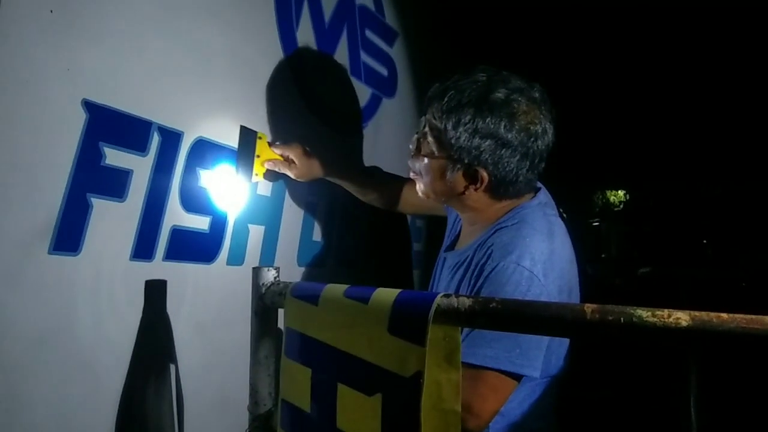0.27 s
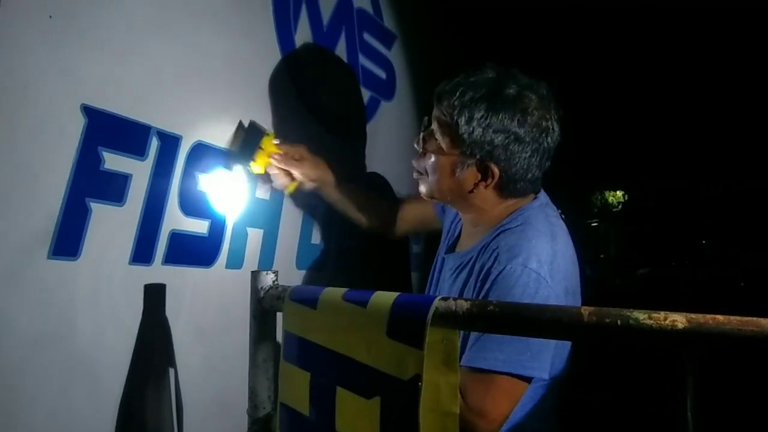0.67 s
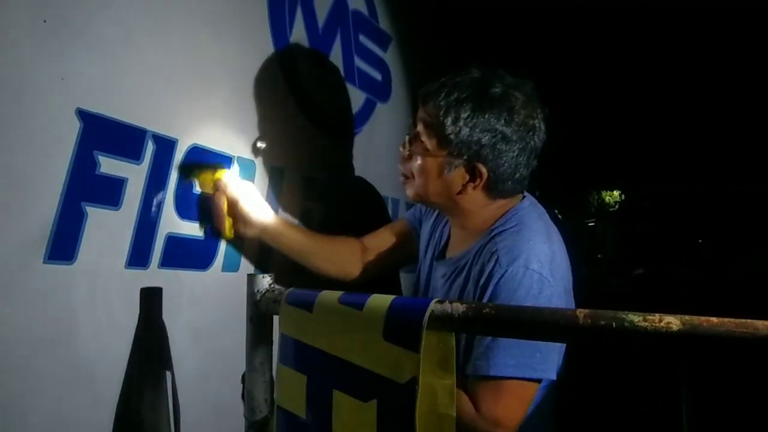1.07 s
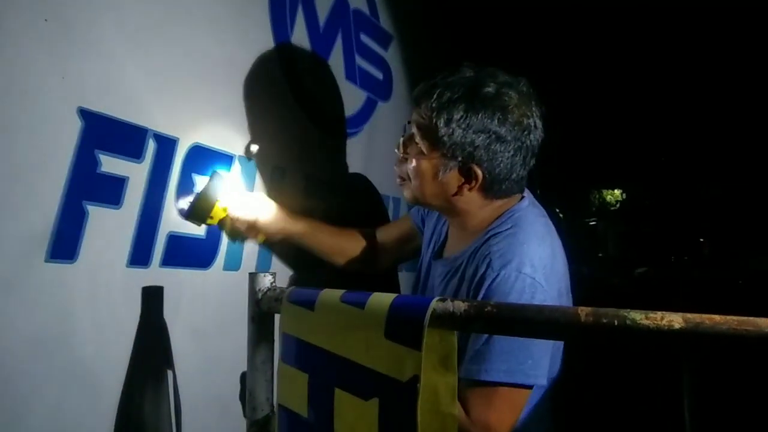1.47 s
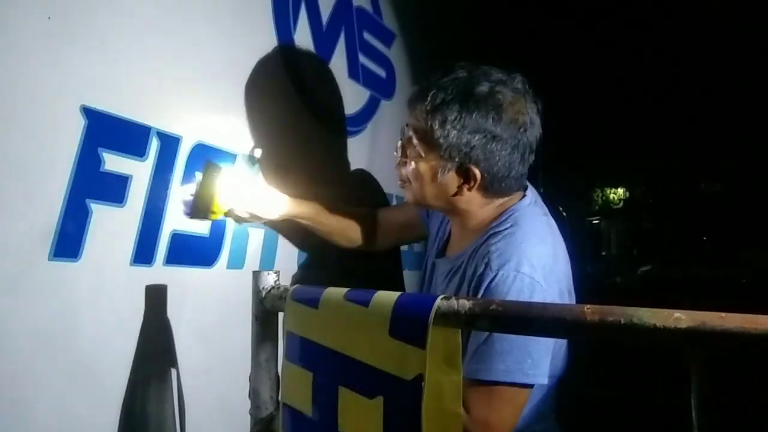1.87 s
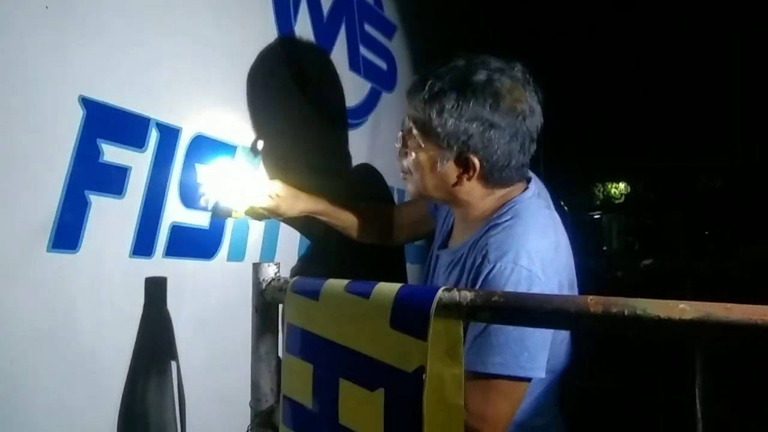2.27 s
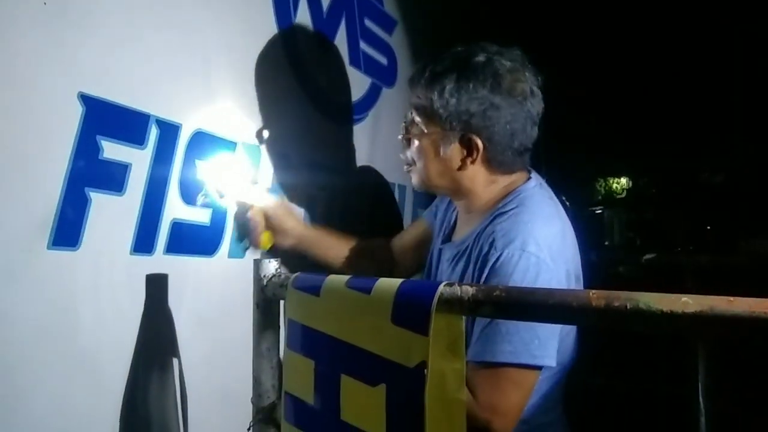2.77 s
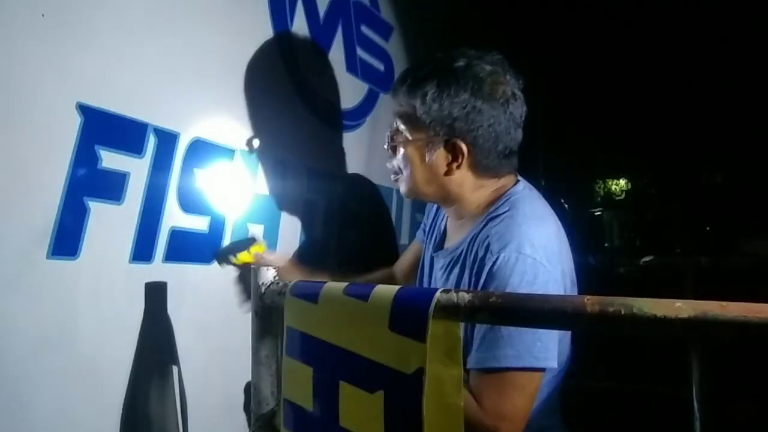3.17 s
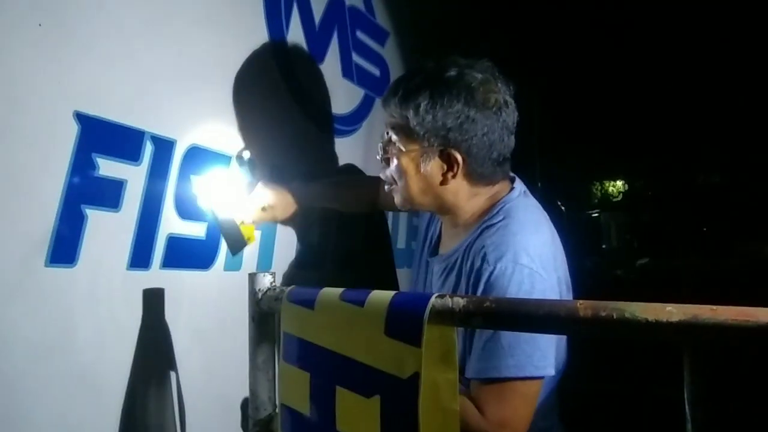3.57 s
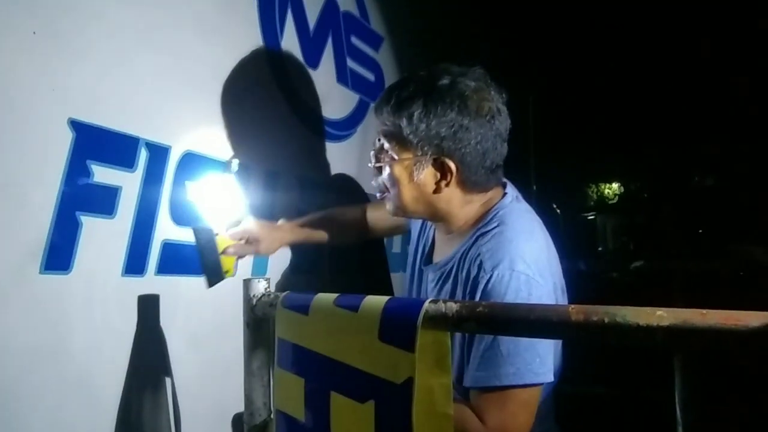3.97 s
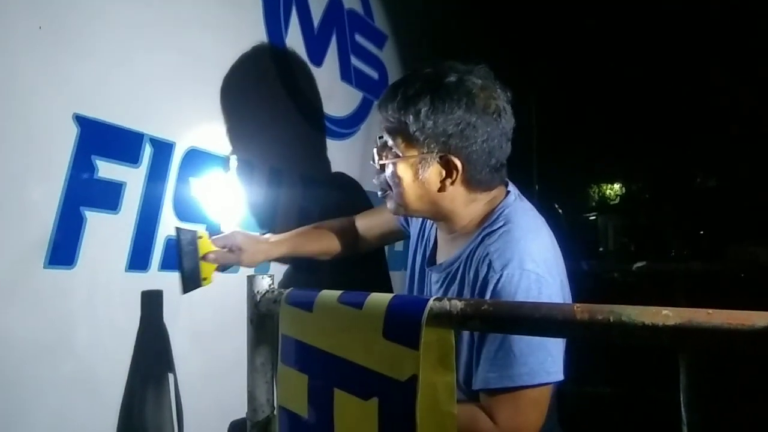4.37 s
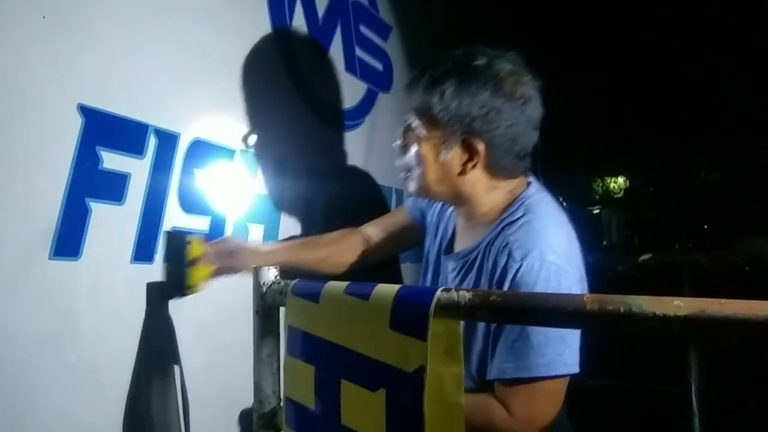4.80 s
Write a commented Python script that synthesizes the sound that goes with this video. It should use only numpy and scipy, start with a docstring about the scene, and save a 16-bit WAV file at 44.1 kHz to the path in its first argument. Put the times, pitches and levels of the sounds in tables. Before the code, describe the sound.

Rapid high insect chirping dominates a dark yard, with soft rubbing, dull knocks and small plastic taps on a panel, and distant low humming.

```python
"""A yard at night: a cricket close by chirps ten times a second, and the walls and the yard answer it.
Its song is gliding tones, three wing strokes to a chirp. Farther off, bush crickets zip and another insect
trills in pulsed tones, over a chorus of shaped noise. A plastic squeegee bumps and taps (noise through
resonances) and softly scrapes (shaped noise) on a vehicle's side. A distant engine hums: tones and noise."""
import sys
import numpy as np
from scipy import signal
from scipy.fft import rfft, irfft, next_fast_len
from scipy.io import wavfile
from scipy.ndimage import uniform_filter1d, map_coordinates

SR = 44100
rng = np.random.default_rng(int(sys.argv[2]) if len(sys.argv) > 2 else 0)


def inscribe(sig):
    """Save sig as 16-bit PCM at rate SR to the path in sys.argv[1].

    A 1-D sig is mono; a 2-D sig holds one channel per row.
    Samples are clipped to [-1, 1] before scaling.
    """
    pcm = np.round(np.clip(np.atleast_2d(sig).T, -1, 1) * 32767)
    wavfile.write(sys.argv[1], SR, pcm.astype(np.int16))


N = 222117  # length in samples


def amp(db):
    """Decibels to gain."""
    return 10 ** (np.asarray(db) / 20)


def unit(x):
    """Scale to an average strength (rms) of 1."""
    return x / np.sqrt(np.mean(x ** 2) + 1e-20)


def clock():
    """The time of every sample, in seconds."""
    return np.arange(N) / SR


def curve(rows):
    """Join (seconds, value) points by straight lines, one value per sample."""
    seconds, values = np.transpose(rows)
    return np.interp(clock(), seconds, values)


def wobble(rate):
    """A smooth random curve through `rate` random points a second."""
    points = rng.standard_normal(int(N * rate / SR) + 4)
    return map_coordinates(points, [clock() * rate])


def phase(hz):
    """Running phase of a gliding tone."""
    return 2 * np.pi * np.cumsum(hz) / SR


def add(track, start_s, sound):
    """Mix a sound into the track, cutting off what lies outside it."""
    i = round(start_s * SR)
    part = sound[max(-i, 0):max(N - i, 0)]
    track[max(i, 0):][:len(part)] += part


def filtered(x, response):
    """Pass x through a filter given as a function of frequency."""
    size = next_fast_len(len(x) + SR // 2)
    hz = np.fft.rfftfreq(size, 1 / SR)
    return irfft(rfft(x, size) * response(hz), size)[:len(x)]


def resonance(f, centre, width):
    """Response of one damped mode: strongest at its own pitch."""
    return 1j * f * width / (centre ** 2 - f ** 2 + 1j * f * width)


def band(f, centre, half_width):
    """Response of a flat-topped pass band with steep sides."""
    return 1 / np.sqrt(1 + np.abs((f - centre) / half_width) ** 20)


def rush(spectrum, patchy_db):
    """Coloured noise of rms 1 whose gain varies in patches over time and pitch."""
    grid = signal.stft(rng.standard_normal(N), nperseg=1024)[2]
    patches = uniform_filter1d(rng.standard_normal(grid.shape), 4, 0)  # smooth over pitch
    patches = uniform_filter1d(patches, 14, 1)  # smooth over time
    noise = signal.istft(grid * amp(patchy_db * unit(patches)), nperseg=1024)[1][:N]
    hz, db = np.transpose(spectrum)
    return unit(filtered(noise, lambda f: amp(np.interp(np.log(f + 1), np.log(hz), db))))


def yard(x, wet_db, t60):
    """A sound with its own diffuse echo, which fades by 60 dB in t60 seconds."""
    t = np.arange(SR // 3) / SR
    tail = rng.standard_normal(len(t)) * amp(-60 * t / t60) * (1 - np.exp(-t / 0.001))
    wet = signal.fftconvolve(x, tail)
    wet *= np.linalg.norm(x) / np.linalg.norm(wet)  # as much energy as the direct sound
    return np.pad(x, (0, len(t) - 1)) + amp(wet_db) * wet


# Colour of the far insects. Each row: frequency in Hz, relative level in dB.
CHORUS_COLOUR = [(5200, -48), (5600, -15.5), (5800, -8.5), (6100, -22.5), (6700, 2.5), (7450, 1), (7800, 4),
                 (8400, -10.5), (8800, -13), (9300, -63), (10300, -20), (10700, -2.5), (11300, -9.5),
                 (11900, -32), (13000, -53)]


def chorus(level_db=-69.5, hiss_db=-86):
    """Many far insects merge into shimmering bands of noise above an even, faint hiss."""
    # Each row: frequency in Hz, relative level in dB.
    hiss_colour = [(2000, 4.5), (4500, 1.5), (9000, 2.0), (12500, -11.5), (15500, 1)]
    hiss = amp(hiss_db) * rush(hiss_colour, patchy_db=1.5)
    insects = amp(level_db + 0.19 * wobble(4.3)) * rush(CHORUS_COLOUR, patchy_db=7.0)
    return insects + hiss


FIRING_HZ, SAG_HZ_PER_S = 69.1, 0.518  # the engine slowly loses speed
HUM_DB, HUM_RAMP_S = -68.5, 0.13  # the firing tone at rest; how fast a surge comes and goes
# Spells of heavier load. Each row: start in seconds, length in seconds, added tone in dB.
LOAD_SURGES = [(-.1, 1.76, -71.5), (1.87, 1.01, -62.5), (3.88, 1.5, -60)]
# Colours of the low rumble and the higher drone. Each row: frequency in Hz, relative level in dB.
RUMBLE_COLOUR = [(15, -32.5), (32, -0.5), (38, -22.5), (44, -18), (53, 3.5), (80, 1), (110, 0.5), (135, 1),
                 (170, -22), (260, -30), (500, -73)]
DRONE_COLOUR = [(110, -52), (143, -9.5), (151, 6.5), (161, 3), (177, 2), (195, -11), (230, -15), (330, -32),
                (600, -60.5)]
# Their strength, before the fixed gains below. Each row: time in seconds, level in dB.
RUMBLE_STRENGTH = [(0.0, -65.5), (1.52, -64.5), (1.74, -69.5), (3.0, -63.5), (3.34, -70), (4.1, -66.5),
                   (4.31, -63.5), (5.04, -65.5)]
DRONE_STRENGTH = [(0.0, -58), (0.28, -61.5), (0.94, -70), (1.09, -74), (1.33, -66.5), (1.67, -73),
                  (1.87, -73.5), (2.02, -70.5), (2.27, -72.5), (2.89, -74), (3.41, -84), (4.18, -69),
                  (4.81, -71), (5.04, -69.5)]
# Steady tones in the drone. Each row: pitch in Hz, relative level in dB.
DRONE_TONES = [(125.5, -3), (151, -0.5), (177.5, -4)]


def engine(rumble_db=4, drone_db=1, lines_db=-1):
    """A distant engine: a wavering firing tone that surges under load, a noisy rumble and a toned drone."""
    t = clock()
    tone = lambda hz: unit(np.sin(phase(hz + 0.63 * wobble(8))))
    load = amp(HUM_DB)
    for start_s, length_s, db in LOAD_SURGES:
        nearest_end_s = np.minimum(t - start_s, start_s + length_s - t)
        load = load + amp(db) * np.clip(nearest_end_s / HUM_RAMP_S, 0, 1)
    hum = load * tone(FIRING_HZ - SAG_HZ_PER_S * t)
    rumble = amp(curve(RUMBLE_STRENGTH) + rumble_db) * rush(RUMBLE_COLOUR, patchy_db=1)
    lines = sum(amp(db) * tone(hz) for hz, db in DRONE_TONES)
    drone = amp(drone_db) * rush(DRONE_COLOUR, patchy_db=2.5) + amp(lines_db) * lines
    return hum + rumble + amp(curve(DRONE_STRENGTH)) * drone


# Each row: start in seconds, length in seconds, level in dB before the echo, pitch in Hz.
FAR_TRILLS = [(0.143, .56, -80, 3793), (2.499, 0.53, -79, 3793), (4.56, 0.11, -99, 3763),
              (4.74, 0.041, -87, 3590), (4.915, 0.11, -86.5, 3740)]


def far_trills(pulse_rate=75, rise_hz=80, fall_hz=400, uneven_db=1.5, waver_hz=55):
    """A distant insect swells into a soft, uneven pulsed whistle, blurred by echoes."""
    out = np.zeros(N)
    for start_s, length_s, db, hz in FAR_TRILLS:
        u = np.linspace(0, 1, int(length_s * SR))  # 0 to 1 through the trill
        chance = lambda: wobble(pulse_rate)[:len(u)]
        cycle = (u * length_s * pulse_rate + 0.24 * chance()) % 1  # 0 to 1 through each pulse
        tone = np.sin(phase(hz + rise_hz * (u - .5) + fall_hz * (.5 - cycle) + waver_hz * chance()))
        swell = amp(uneven_db * chance()) * np.abs(np.sin(np.pi * u ** 1.22)) ** 0.56
        pulses = np.abs(np.sin(np.pi * cycle)) ** 4
        add(out, start_s, yard(amp(db) * unit(swell * pulses * tone), wet_db=4, t60=0.12))
    return out


# Each row: start in seconds, length in seconds, level in dB before echo and filter,
# first pitch in Hz, last pitch in Hz, fall within a pulse in Hz.
BUSH_CRICKET_ZIPS = [(-.02, 0.044, -61, 9100, 9280, 1500), (.105, 0.02, -88, 14900, 15100, 900),
                     (1.708, 0.063, -62, 9230, 9540, 1630), (1.937, 0.039, -66, 12000, 12960, 1300),
                     (1.962, 0.044, -69.5, 14500, 15050, 3750), (4.952, 0.047, -60.5, 9170, 9500, 1510)]


def bush_crickets(pulse_rate=215, onset_db=-10):
    """A zip is a quick run of falling pulses that climbs in pitch and strength."""
    out = np.zeros(N)
    for start_s, length_s, db, first_hz, last_hz, fall_hz in BUSH_CRICKET_ZIPS:
        u = np.linspace(0, 1, int(length_s * SR))  # 0 to 1 through the zip
        cycle = (u * length_s * pulse_rate + 0.5 * wobble(100)[:len(u)]) % 1
        hz = first_hz + (last_hz - first_hz) * u + fall_hz * (.5 - cycle)
        swell = amp(onset_db * (1 - u) ** 2) * signal.windows.tukey(len(u), .1)
        tone = np.sin(phase(hz + 220 * wobble(300)[:len(u)]))
        pulses = np.tanh(5 * np.sin(np.pi * cycle) ** 2) * tone
        wing = lambda f: band(f, (first_hz + last_hz) / 2, 0.5 * fall_hz)
        echoed = yard(amp(db) * unit(swell * pulses), wet_db=4.0, t60=0.35)
        add(out, start_s, filtered(echoed, wing))
    return out


# Colours of the rub, the panel's body and the blade's edge. Each row: frequency in Hz, relative level in dB.
RUB_COLOUR = [(260, -38), (450, -12.5), (540, -10.5), (660, 4.5), (760, -0.5), (900, 5.5), (1150, -1),
              (1400, 4), (1650, 3.5), (2080, -3), (2250, -46.5), (2600, -39), (3400, -73), (5000, -109)]
BODY_COLOUR = [(180, -24.5), (290, -5.5), (350, -9), (440, 2), (560, 8.5), (700, -18), (900, -66)]
EDGE_COLOUR = [(1700, -28), (2150, 6), (2400, -0.5), (2800, -13), (3400, -46), (4500, -34)]
# How hard the blade rubs, before lifts and small changes. Each row: time in seconds, level in dB.
RUB_EFFORT = [(0.0, -65.5), (0.22, -66.5), (0.38, -70.5), (0.62, -69.5), (0.76, -69.5), (0.98, -71.5),
              (1.15, -64.5), (1.37, -68.5), (1.54, -66), (1.71, -66.5), (2.1, -70), (2.23, -65.5),
              (2.72, -68), (3.09, -63), (3.9, -62.5), (4.21, -61), (4.71, -59), (5.04, -58)]
# The blade eases off the panel between strokes. Each entry: time in seconds.
BLADE_LIFTS = [0.507, 1.138, 1.7]
LIFT_DB, LIFT_LENGTH_S = -8, 0.047
USUAL_EFFORT_DB = -64
BODY_DB, BODY_GROWS = -73.5, 1.79  # the panel's body at usual effort; its dB per dB of effort
EDGE_DB, EDGE_GROWS = -86.5, 2.88  # the same for the hiss of the blade's edge
# The blade's edge swishes once as it is turned round.
FLICK_S, FLICK_LENGTH_S, FLICK_DB = 0.918, 0.074, -77.5


def scrape(echo_share=0.38, echo_hz=210, rub_db=1.35, grain_db=1, unsteady_db=1.2):
    """The blade rubs with a fine grain; effort brings out body and edge; a shifting echo colours it."""
    bump = lambda s, length_s: np.exp(-((clock() - s) / length_s) ** 2)
    level_db = curve(RUB_EFFORT) + sum(LIFT_DB * bump(s, LIFT_LENGTH_S) for s in BLADE_LIFTS)
    push_db = level_db - USUAL_EFFORT_DB
    rub_level_db = level_db + rub_db + grain_db * wobble(120) + unsteady_db * wobble(14)
    rub = amp(rub_level_db) * rush(RUB_COLOUR, patchy_db=3.0)
    body = amp(BODY_DB + BODY_GROWS * push_db) * rush(BODY_COLOUR, patchy_db=5.5)
    flick = amp(FLICK_DB) * bump(FLICK_S, FLICK_LENGTH_S)
    edge = (amp(EDGE_DB + EDGE_GROWS * push_db) + flick) * rush(EDGE_COLOUR, patchy_db=5)
    x = rub + body + edge
    delay = SR / (echo_hz * (1 + 0.073 * wobble(2.004)))  # in samples
    return x + echo_share * map_coordinates(x, [np.arange(N) - delay])


# Each row: start in seconds, length in seconds, level in dB, pitch in Hz halfway through.
HOLLOW_NOTES = [(-.08, 0.27, -65, 600), (0.149, 0.26, -71.5, 900), (.58, .16, -70, 835),
                (0.801, 0.21, -69.5, 540), (1.32, 0.13, -73, 1028), (1.48, 0.21, -65.5, 820),
                (1.978, 0.33, -64.5, 655), (3.08, 0.249, -68, 570), (3.39, 0.24, -63, 490),
                (4.196, 0.36, -69.5, 330.7), (4.25, 0.99, -63.5, 449.3)]
NOTE_FALL_OCT_PER_S = 0.37  # octaves per second


def hollow_notes(note_width_hz=110, octave_db=-7):
    """Now and then the scrape sings a fuzzy note that swells, sinks in pitch and fades."""
    out = np.zeros(N)
    chance = lambda p: wobble(note_width_hz)[:len(p)]
    fuzzy = lambda p: unit(chance(p) * np.sin(p) + chance(p) * np.cos(p))
    for start_s, length_s, db, hz in HOLLOW_NOTES:
        u = np.linspace(0, 1, int(length_s * SR))
        turn = phase(hz * 2 ** (NOTE_FALL_OCT_PER_S * length_s * (.5 - u)))
        note = fuzzy(turn) + amp(octave_db) * fuzzy(2 * turn)
        add(out, start_s, amp(db) * np.sin(np.pi * u) * note)
    return out


# Soft bumps of the squeegee and hand on the panel, levels before echo and dulling.
# Each row: time in seconds, knock level in dB, boom level in dB, boom pitch in Hz.
SOFT_BUMPS = [(.79, -78, -59.5, 175), (1.186, -53.5, -48.5, 100), (1.214, -62, -62, 105),
              (1.911, -57, -52.5, 128), (1.947, -65, -50, 105), (2.956, -61.5, -53, 110),
              (2.973, -54.5, -52.5, 131), (3.018, -84, -46.5, 72), (3.662, -56, -54.5, 114),
              (4.05, -72, -54, 130), (4.151, -78, -52.5, 116), (4.55, -72, -56.5, 150),
              (4.86, -72, -59.5, 150)]
# Ringing modes of the panel. Each row: pitch in Hz, width in Hz, relative level in dB.
PANEL_MODES = [(300, 46, -3), (417, 53, 8.5), (600, 95, 7), (850, 260, 1.5), (1340, 77, -1), (1730, 93, 3)]
# Hard taps of the blade. Each row: time in seconds, level in dB before echo and dulling,
# resonance in Hz, width in Hz of each of four equal filters, echo in dB against the tap.
BLADE_TAPS = [(1.91, -64, 1800, 600, -1), (3.240, -54.5, 1160, 1770, -0.5), (3.242, -62, 2900, 600, -2),
              (3.251, -57, 1860, 1500, -2), (3.351, -66.5, 4040, 647, 2.5), (3.66, -46.5, 850, 1140, -8),
              (3.663, -57.5, 1480, 1340, 0), (3.66, -74, 3940, 1800, -7)]


def squeegee(boom_damping=0.63, dull_hz=3800, rattle=0.058):
    """Soft bumps shake the panel and its low boom; the blade's plastic edge gives short, dull ticks."""
    out, t = np.zeros(N), np.arange(SR // 4) / SR
    burst = lambda t60: rng.standard_normal(len(t)) * amp(-60 * t / t60)
    sized = lambda x: x / np.sqrt(uniform_filter1d(x ** 2, SR // 100).max())  # loudest moment at rms 1

    def panel(f):
        """The panel's modes added up, every second one upside down."""
        return sum((-1) ** k * amp(db) * resonance(f, hz, width)
                   for k, (hz, width, db) in enumerate(PANEL_MODES))

    for s, db, boom_db, boom_hz in SOFT_BUMPS:
        knock = filtered(burst(t60=0.15), lambda f: panel(f) / (1 + 1j * f / 1200) ** 3)  # softened treble
        boom = filtered(burst(t60=0.13), lambda f: resonance(f, boom_hz, boom_damping * boom_hz) ** 2)
        add(out, s, yard(amp(db) * sized(knock), wet_db=-8.0, t60=.3))
        add(out, s, amp(boom_db) * sized(boom))
    for s, db, hz, width_hz, echo_db in BLADE_TAPS:
        strike = (t == 0) + rattle * burst(t60=0.023)  # one sharp contact and a brief rattle
        tick = filtered(strike, lambda f: resonance(f, hz, width_hz) ** 4)
        add(out, s, yard(amp(db) * sized(tick), wet_db=echo_db, t60=0.24))
    return filtered(out, lambda f: 1 / np.sqrt(1 + (f / dull_hz) ** 12))


# The near cricket's tempo. Each row: time in seconds, chirps per second.
CHIRP_TEMPO = [(0.0, 10.192), (0.388, 9.965), (1.189, 9.942), (1.235, 10.088), (2.094, 9.972),
               (2.856, 10.139), (4.038, 10.065), (4.203, 10.357), (5.04, 10.008)]
# The three wing strokes of every chirp, last and loudest first. Each row: relative level in dB, pitch drop in Hz.
CHIRP_STROKES = [(0, -0.5), (-6.5, 77), (-21.5, 219)]
# The course of one wing stroke. Each row: seconds from its peak, pitch in Hz before the drop, relative level in dB.
STROKE_SHAPE = [(-.008, 7120, -45), (-.005, 7100, -10), (-.003, 7070, 0), (-.001, 6970, 3),
                (.0005, 6820, 0), (.002, 6530, -11.5), (.0035, 6430, -14), (.005, 6160, -50)]
# Echoes from nearby surfaces. Each row: delay in seconds, level in dB against the direct sound.
WALL_ECHOES = [(.001059, -7), (.00475, -9), (.007257, -11), (.00878, -16), (.014776, -22)]
FIRST_CHIRP_S = -.0114
STROKE_GAP_S, GAP_SCATTER_S, CHIRP_JITTER_S = .0153, 0.00089, 0.00061  # stroke gap; chance in gap and beat
CHIRP_DB, TIRING_DB_PER_S, STROKE_SCATTER_DB = -32.5, 0.24, 0.62  # the song slowly weakens


def cricket(overtone_db=-52, scatter=0.0033, stretch_scatter=0.12, wing_hz=6870, wing_width_hz=600):
    """Each chirp is three wing strokes of growing strength; every stroke falls in pitch as the wing slows."""
    out, t = np.zeros(N), np.arange(-SR // 20, SR // 30) / SR
    when, pitch_hz, swell_db = np.transpose(STROKE_SHAPE)
    beats = np.cumsum(curve(CHIRP_TEMPO)) / SR
    chirp_times = FIRST_CHIRP_S + np.interp(np.arange(beats[-1]), beats, clock())
    walls = lambda f: 1 + sum(amp(db) * np.exp(-2j * np.pi * f * delay) for delay, db in WALL_ECHOES)
    for s in chirp_times:
        chirp = np.zeros(len(t))
        gap = STROKE_GAP_S + GAP_SCATTER_S * rng.normal()
        s += CHIRP_JITTER_S * rng.normal()
        for k, (stroke_db, drop_hz) in enumerate(CHIRP_STROKES):
            age = (t + k * gap) * np.exp(stretch_scatter * rng.normal())  # time from this stroke's peak
            db = CHIRP_DB - TIRING_DB_PER_S * s + stroke_db + STROKE_SCATTER_DB * rng.normal()
            hz = (np.interp(age, when, pitch_hz) - drop_hz) * (1 + scatter * rng.normal())
            turn = phase(hz) + 2 * np.pi * rng.random()
            swell = np.interp(age, when, swell_db, left=-np.inf, right=-np.inf)  # silent outside the stroke
            chirp += amp(db + swell) * np.sin(turn)
        add(out, s + t[0], filtered(chirp, walls))
        diffuse = yard(chirp, wet_db=-6.0, t60=0.24) - np.pad(chirp, (0, SR // 3 - 1))  # the echo alone
        add(out, s + t[0], diffuse)
    # the wing radiates only near its resonance, with a faint octave
    radiated = filtered(out, lambda f: band(f, wing_hz, wing_width_hz))
    song = signal.hilbert(radiated, next_fast_len(N))[:N]
    return song.real + amp(overtone_db) * np.abs(song) * np.cos(2 * np.angle(song))


def scene():
    """Everything at one microphone."""
    background = chorus() + engine() + far_trills() + bush_crickets()
    wiping = scrape() + hollow_notes() + squeegee()
    return (background + wiping + cricket())[None]


def record(dry):
    """The recorder keeps nothing from 15600 Hz up."""
    return np.array([filtered(x, lambda f: f < 15600) for x in dry])


dry = scene()
out = record(dry)
inscribe(out)
```